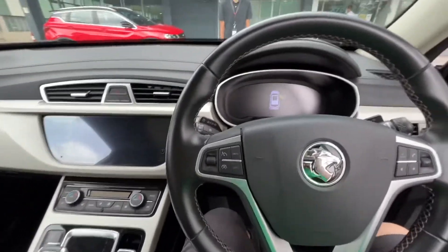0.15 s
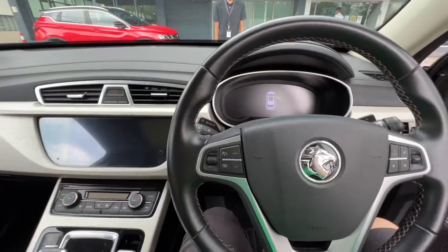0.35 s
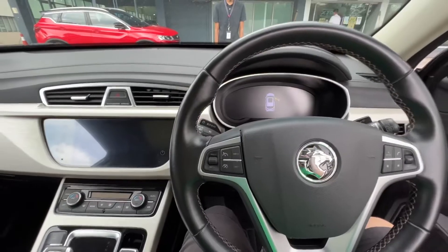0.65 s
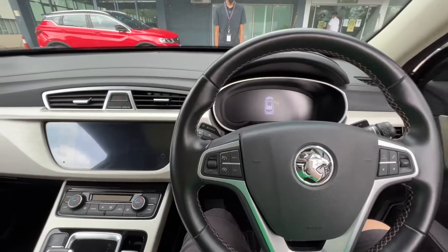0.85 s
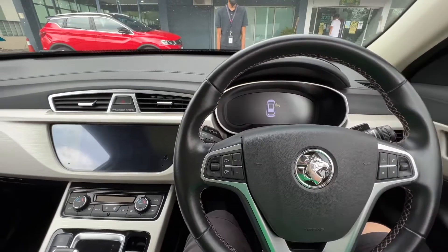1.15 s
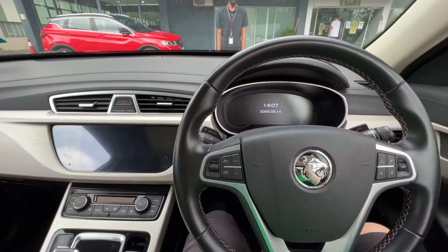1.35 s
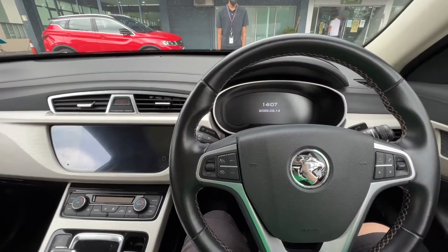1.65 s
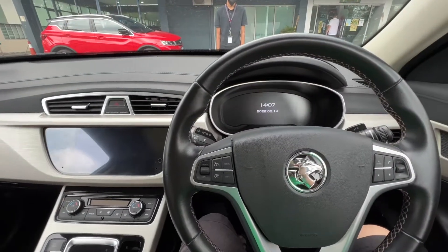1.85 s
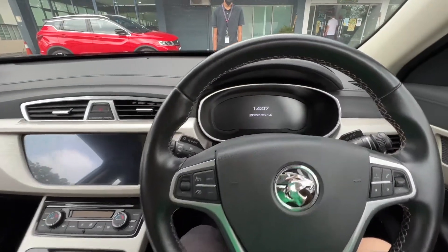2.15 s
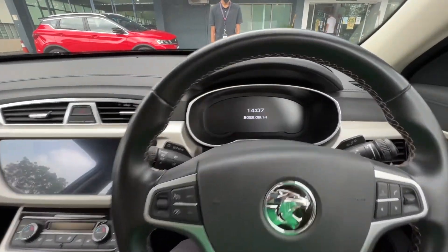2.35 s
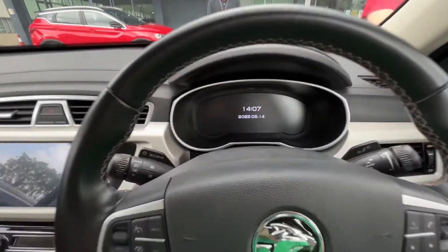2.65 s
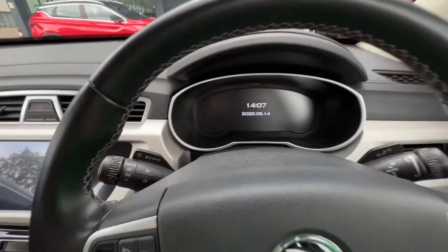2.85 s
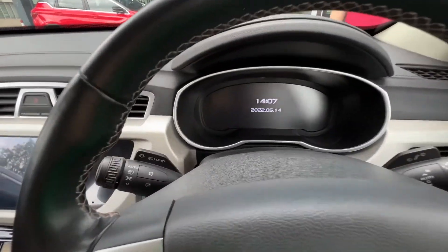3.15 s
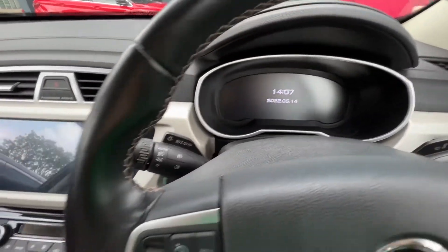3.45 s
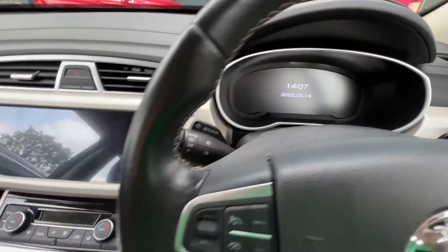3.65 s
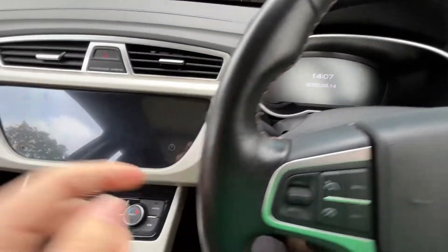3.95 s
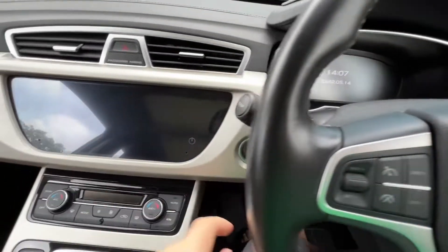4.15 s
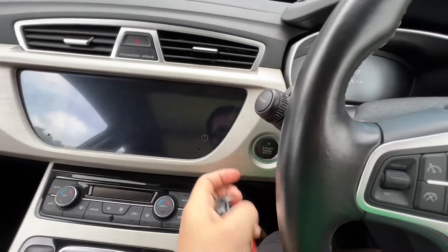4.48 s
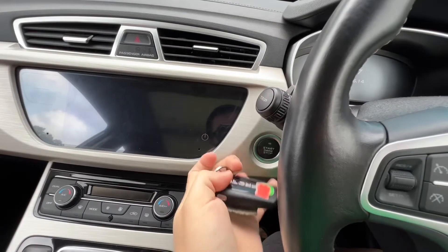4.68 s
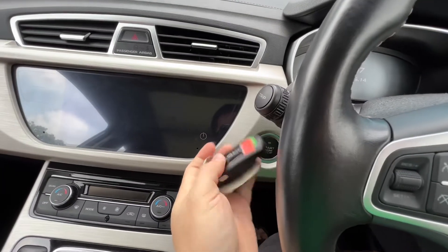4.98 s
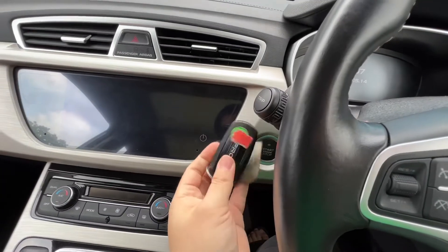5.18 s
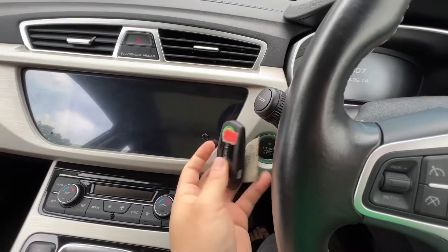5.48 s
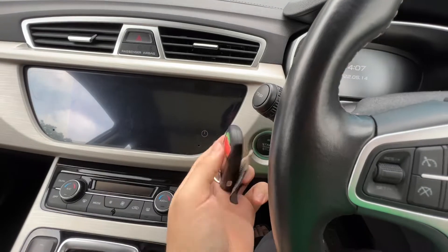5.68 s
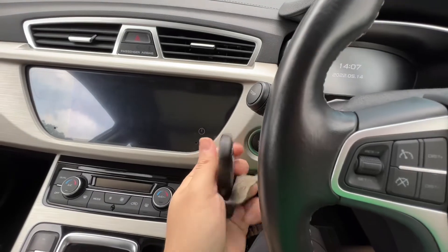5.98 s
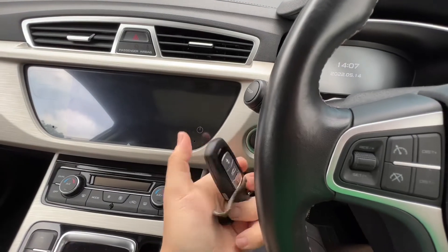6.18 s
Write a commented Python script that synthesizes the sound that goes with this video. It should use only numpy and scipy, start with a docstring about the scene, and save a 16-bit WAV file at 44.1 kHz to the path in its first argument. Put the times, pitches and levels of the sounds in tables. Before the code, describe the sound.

Faint street noise is cut off by a loud car door thud, leaving a quiet rumbling cabin with soft seat rustles, muffled knocks and small plastic clicks.

```python
"""Car door pulled shut

Inside a parked car, the driver's door is pulled shut: the latch strikes, the cabin air booms, the door
rattles on its rebound. The street hiss is shut out and a low rumble remains. Clothes slide on the seat,
a hand bumps the trim, and a plastic key fob is turned in the fingers. Knocks are shaped noise bursts and
ringing modes, the boom is a gliding tone, the rest is filtered noise and a chirp.
Levels in the tables are those before each layer's own trims and panning."""
import sys
import numpy as np
from scipy import signal
from scipy.io import wavfile

SR = 44100
rng = np.random.default_rng(int(sys.argv[2]) if len(sys.argv) > 2 else 0)


def generate_wav(signal):
    """Clip the signal to [-1, 1] and save it as 16-bit WAV at the path in sys.argv[1]."""
    frames = np.transpose(np.atleast_2d(signal))
    scaled = np.clip(frames, -1, 1) * 32767
    pcm = np.round(scaled).astype(np.int16)
    wavfile.write(sys.argv[1], SR, pcm)


N = 278712
TIME = np.arange(N) / SR   # seconds
EDGES = 20 * 2 ** (np.arange(30) / 3)   # limits of the third-octave bands, Hz
CENTRES = np.sqrt(EDGES[1:] * EDGES[:-1])   # Hz


def door():
    """The trim clatters, the shell rings, the latch clangs, the panel thuds and the sealed air booms."""
    clatter = door_clatter()
    shell = door_shell()
    steel = from_db(-1.0) * latch()
    panel = door_panel()
    return clatter + shell + steel + panel + boom(spread=0.25)


# Contacts of latch, striker, seal and rattling trim.
# Each row: start in seconds, clack in dB, knock in dB, treble slope in dB per octave.
DOOR_CONTACTS = [(1.132, -20, -19, -8), (1.14, -15.5, -20.5, -18), (1.147, -13.5, -11, -10.5),
                 (1.152, -22, -7.5, -3), (1.177, -28, -18, -3.5), (1.197, -20, -29.5, -8),
                 (1.222, -30.5, -22.5, -5), (1.241, -49.5, -36, 0.5), (1.267, -35, -26, -9.5),
                 (1.306, -30.5, -17, -16), (1.311, -35, -21.5, -5.5), (1.322, -36, -18, -14),
                 (1.331, -26.5, -27.5, -5.5), (1.347, -31, -23.5, -8.5), (1.355, -31.5, -32.5, -14),
                 (1.366, -31, -29, -19), (1.43, -34, -32.5, -13.5), (1.442, -41, -47, -10)]
# Colour of the clatter. Each row: frequency in Hz, level in dB per Hz.
CLATTER_COLOUR = [(88, -30), (150, 3), (230, -4.5), (360, -9), (500, -10.5), (800, -17.5), (1200, -16),
                  (1700, -17.5), (1950, -25), (2350, -26), (2900, -33.5), (3700, -35), (5000, -42.5),
                  (9270, -44.5), (11700, -50.5), (13900, -68.5), (15000, -64)]
# How long door and cabin ring. Each row: frequency in Hz, time to fall by 60 dB in seconds.
CLATTER_DECAY = [(200, 0.13), (600, 0.16), (1500, 0.16), (4000, 0.19), (12000, 0.15)]


def door_clatter():
    """Each contact is a noise burst: the clack and knock set its mids and lows, the slope its treble."""
    zones = [(700, 2500), (170, 700), (2500, 6000), (6000, 17000)]   # Hz: clack, knock, snap, tick
    snap_octaves, tick_octaves = 1.5, 3   # above the clack
    hits = [(s, clack, knock, clack + slope * snap_octaves, clack + slope * tick_octaves)
            for s, clack, knock, slope in DOOR_CONTACTS]
    clatter = contacts(hits, zones, trims_db=[-1.2, 0.94, -0.5, 0.92], colour=CLATTER_COLOUR,
                       t60=per_band(CLATTER_DECAY), rise_s=.0011, crack_s=0.003, tail_db=-8)
    clatter = reflections(clatter, wet_db=-21.5, longest_s=0.0056)
    # the body of the clatter comes from the door on the right, its treble off the windscreen
    body = signal.sosfilt(signal.butter(1, 800, fs=SR, output="sos"), clatter)
    treble = clatter - body
    return from_right(panned(body, left_db=-5.0) + panned(treble, left_db=3.5), lag_s=.0004)


# Steel of the latch striking home and chattering on the rebound.
# Each row: start in seconds, level in dB, frequency in Hz that the point of contact favours.
LATCH_STRIKES = [(1.1301, -18.5, 3500), (1.1307, -21.5, 2150), (1.1316, -19.5, 1430), (1.1375, -29.5, 3580),
                 (1.139, -22.5, 950), (1.145, -21.5, 1100), (1.15, -11.5, 1700), (1.1524, -16.5, 2520),
                 (1.198, -25, 2000), (1.313, -31, 1350), (1.331, -23, 2080), (1.333, -25.5, 1340),
                 (1.346, -23.5, 1410), (1.357, -35, 1250), (1.366, -35, 1900), (1.432, -37, 1350),
                 (1.447, -41, 1400)]
# Ringing tones of the latch. Each row: frequency in Hz, level in dB, time to fall by 60 dB in seconds.
LATCH_MODES = [(1015, -2, .04), (1240, 0, .05), (1400, -1, .035), (1490, -4, .03), (1630, -4, .022),
               (1735, -1, .028), (1970, -1, .03), (2150, -2, .028), (2440, -3, .03), (2600, -2, .025),
               (2900, -3, .02), (3440, 0, .028), (3760, 0, .028), (4650, -7, .018)]
# Each strike skips on: for at most how many seconds, how much weaker (dB), how far its pitch strays
CHATTER_S, CHATTER_DB, CHATTER_OCTAVES = .008, -13.5, 0.28


def latch():
    """Steel strikes steel and skips a few times; each touch rings the tones nearest its own pitch."""
    skips = []
    for s, level_db, hz in LATCH_STRIKES:
        for _ in range(3):
            later_s = s + CHATTER_S * rng.uniform(.1, 1)
            skips.append((later_s, level_db + CHATTER_DB, hz * 2 ** (CHATTER_OCTAVES * rng.standard_normal())))
    blows = LATCH_STRIKES + skips
    steel = np.array([struck(blows, LATCH_MODES, focus_db=24.5, scatter_db=2.0) for side in range(2)])
    steel = reflections(steel, wet_db=-15.5, longest_s=0.0053)
    return panned(from_right(steel, lag_s=.00015), left_db=3.0)


# Ringing tones of the door shell. Each row: frequency in Hz, level in dB, time to fall by 60 dB in seconds.
SHELL_MODES = [(284, -11, .11), (423, -17, .1), (528, -17, .13), (577, -17, .11), (704, -15, .17),
               (824, -17, .12), (935, -17, .14), (1020, -20, .14), (1174, -15, .12), (1256, -17, .13),
               (1400, -20, .09), (1455, -19, .09), (1571, -20, .09), (1725, -25, .09), (1960, -22, .1),
               (2426, -21, .09), (3446, -29, .1)]


def door_shell():
    """The contacts ring the shell, heard from the side: the two ports get it in opposite phase."""
    shell = np.array([sign * ring(DOOR_CONTACTS, SHELL_MODES, scatter_db=4.0, contact_hz=5000)
                      for sign in (1, -1)])
    shell[1] = np.roll(shell[1], int(.0003 * SR))   # one port hears it later
    return panned(from_db(-2.0) * shell, left_db=-3.0)


# The door's weight landing on the seal. Each row: start in seconds, level in dB.
DOOR_SHOVES = [(1.147, -18), (1.1565, -10), (1.191, -15), (1.218, -24), (1.27, -15), (1.311, -17.5),
               (1.326, -19.5), (1.357, -20)]
# Slow tones of the door panel. Each row: frequency in Hz, level in dB, time to fall by 60 dB in seconds.
PANEL_MODES = [(92.3, -1, 0.15), (111.4, -9.5, 0.45), (138.4, -9.5, 0.3), (154, -5, 0.12),
               (197.2, -13, 0.055), (254, -14, 0.045)]


def door_panel():
    """The weight of the door shoves the soft seal, so only low tones of the panel ring."""
    panel = ring(DOOR_SHOVES, PANEL_MODES, scatter_db=3.5, contact_hz=395)
    return from_db(-1) * from_right(panned(panel, left_db=-2.4), lag_s=0.0007)


# Cabin air pumped by the door as it swings in, lands and rocks on the seal.
# Each row: peak time in seconds, half length in seconds, pitch in Hz, peak level in dB.
AIR_PUMPS = [(1.126, 0.036, 51, -16.5), (1.178, 0.013, 65.5, -6), (1.253, .037, 49.6, -6.5),
             (1.346, 0.025, 60.8, -18.5), (1.466, 0.068, 47.5, -21.5)]
PRESSED_S = 1.171   # the door is deepest in its seal and the air most compressed


def boom(spread):
    """Trapped air swings with each push; standing waves put the sides slightly out of step (radians)."""
    pushes = np.array([from_db(level_db) * bell(s, half_s) for s, half_s, hz, level_db in AIR_PUMPS])
    level = pushes.sum(axis=0)
    pitch = np.array(AIR_PUMPS)[:, 2] @ pushes / level   # the strongest push decides most
    phase = 2 * np.pi * np.cumsum(pitch) / SR
    phase -= phase[int(PRESSED_S * SR)]
    return level * np.cos(phase + spread * drift(rate=12) * [[1], [-1]])


# Bumps of hand and knee on the seat and trim. Each row: start in seconds, knock in dB, floor pan in dB,
# treble slope in dB per octave, frequency in Hz that the spot favours.
BUMPS = [(3.323, -50.5, -48, -9.5, 731), (3.361, -49, -58.5, -19.5, 646), (3.387, -48.5, -41, -5.5, 780),
         (3.442, -53, -65, -25, 597), (3.497, -48.5, -49.5, -22.5, 770), (3.543, -49, -63.5, -17, 780),
         (3.573, -47, -64, -8, 560), (3.612, -49, -46, -6.5, 766), (3.651, -47, -47, -5, 775),
         (3.665, -32, -25, -10, 520), (3.741, -47.5, -45, -8, 500), (3.782, -43, -54, -17, 496),
         (3.831, -38.5, -43, -8, 570), (3.841, -40.5, -28.5, -13, 493), (3.926, -51, -49, -18, 450),
         (3.971, -43.5, -59, -9, 416), (4.02, -39.5, -43, -11, 520), (4.029, -41, -42, -11, 395),
         (4.08, -37.5, -33.5, -23, 543), (4.122, -40.5, -37, -10.5, 510), (4.154, -39.5, -36.5, -21, 480),
         (4.218, -48.5, -46, -18, 776), (4.233, -53, -39, -15, 400), (4.246, -52, -44, -2.5, 450),
         (4.27, -48.5, -44, -5.5, 400), (4.295, -38, -36.5, -9, 530), (4.348, -50, -50, -14, 500),
         (4.441, -44.5, -44, -9, 417), (4.631, -39.5, -41, -8, 457), (4.659, -46.5, -34, -5.5, 393),
         (4.862, -48, -67, -3, 1090)]
# Colour of the knocks. Each row: frequency in Hz, level in dB per Hz.
BUMP_COLOUR = [(53, -33), (90, 4), (125, -15.5), (286, -22.5), (463, -19), (630, -19), (735, -41),
               (926, -25), (1590, -31), (1780, -34), (9000, -61), (11700, -89), (19800, -120)]
# Short tones of the padded trim. Each row: frequency in Hz, level in dB, time to fall by 60 dB in seconds.
TRIM_MODES = [(329, 0, 0.13), (431, 0.5, 0.067), (482, 4, 0.044), (591, -1.5, 0.05), (779, -2, 0.037),
              (908, -9.5, 0.07), (1110, -2.5, 0.049), (1670, -12, .025)]
# Low tones of the floor pan. Each row: frequency in Hz, level in dB, time to fall by 60 dB in seconds.
FLOOR_MODES = [(123, 2, 0.14), (145.3, -26, 0.06)]
FLOOR_LAG_S = 0.0101   # the floor pan answers late
THUD_OVER_KNOCK_DB = -2   # the padding thuds with every knock


def bumps():
    """Dull, hollow knocks of hand and knee on padded trim, over the slips of the seat."""
    zones = [(250, 1000), (90, 250), (1000, 2500), (2500, 9000)]   # Hz: knock, thud, clack, snap
    clack_octaves, snap_octaves = 1.5, 2.5   # above the knock
    slips = seat_slips()
    blows = [(s, knock, slope, hz) for s, knock, floor, slope, hz in BUMPS] + slips
    hits = [(s, knock, knock + THUD_OVER_KNOCK_DB, knock + slope * clack_octaves, knock + slope * snap_octaves)
            for s, knock, slope, hz in blows]
    knocks = contacts(hits, zones, trims_db=[-1.5, 1.5, 1.5, 0.0], colour=BUMP_COLOUR,
                      t60=0.18, rise_s=0.0014, crack_s=0.0023, tail_db=-9)
    taps = [(s, knock, hz) for s, knock, slope, hz in blows]
    trim = np.array([struck(taps, TRIM_MODES, focus_db=21.5, scatter_db=3.5) for side in range(2)])
    floor_blows = [(s + FLOOR_LAG_S, floor) for s, knock, floor, slope, hz in BUMPS]
    thuds = ring(floor_blows, FLOOR_MODES, scatter_db=1.5, contact_hz=192.5)
    knocks = reflections(knocks, wet_db=-20.5, longest_s=0.004)
    return panned(knocks + from_db(-4.5) * trim + thuds, left_db=1.5)


def seat_slips():
    """The seat cover sticks and slips under the shifting weight: (s, dB, slope dB per octave, Hz)."""
    return [(s, -50.5 + 1.2 * rng.standard_normal(), -10.5, rng.uniform(430, 1200))
            for s in uneven_times(3.6, 4.7, count=16)]


# Small plastic clicks, nearly all from the key fob and its ring.
# Each row: start in seconds, snap peak in dB, brightness in dB.
KEY_CLICKS = [(0.867, -46, 5.5), (2.518, -66, 16), (4.367, -57, 0), (4.406, -41.5, 4), (4.431, -54, 7),
              (4.4802, -44.5, -3.5), (4.574, -46.5, 2), (4.9417, -55.5, 8), (4.9514, -50.5, -3.5),
              (4.9776, -38, 2), (5.0007, -38, -0.5), (5.05, -48.5, -7), (5.0605, -44, 5.5),
              (5.139, -47.5, 1.5), (5.1811, -56, 15.5), (5.4322, -46.5, 1), (5.577, -61, 4),
              (5.639, -65, -6), (5.704, -55, 8.5), (5.8215, -53.5, 3.5), (5.8616, -39.5, 5.5),
              (6.074, -61, 0), (6.0855, -52.5, 6), (6.111, -58, 0.5)]
# Colour of the clicks. Each row: frequency in Hz, level in dB per Hz.
KEY_COLOUR = [(470, -45), (800, -56), (1160, 4), (1630, -7.5), (1800, 1.5), (2190, -12), (2410, 2),
              (4620, -3), (5490, -5), (9070, -1), (10500, -5), (12300, -10), (15000, -49)]
# Ringing tones of the fob's plastic shell and metal ring.
# Each row: frequency in Hz, level in dB, time to fall by 60 dB in seconds.
KEY_MODES = [(2285, -5, 0.081), (2640, -11, 0.11), (3140, -7, 0.015), (4370, -6, 0.055), (4690, 7, 0.037),
             (5140, 2, 0.023), (6870, -2, 0.028), (8700, 2, 0.026), (11900, -15, 0.022)]
KEY_CLACK_DB, KEY_TICK_DB = -5.5, -18   # beside the snap; brightness trades clack for tick
KEY_PITCH_HZ, KEY_BRIGHT_DB_PER_OCTAVE = 4280, 23   # brighter clicks ring higher modes


def key_fob():
    """Small hard clicks that ring the fob, and rubs between them, close by and a little to the left."""
    zones = [(2500, 7000), (800, 2500), (7000, 17000)]   # Hz: snap, clack, tick
    # fainter ticks while the fob turns in the fingers
    turns = [(s, -63.5 + 1.46 * rng.standard_normal(), 0) for s in uneven_times(5.55, 6.15, count=5)]
    touches = KEY_CLICKS + turns
    hits = [(s, snap, snap + KEY_CLACK_DB - bright, snap + KEY_TICK_DB + bright) for s, snap, bright in touches]
    clicks = contacts(hits, zones, trims_db=[-9, -5.5, -1], colour=KEY_COLOUR,
                      t60=0.18, rise_s=.0001, crack_s=0.0022, tail_db=-7)
    taps = [(s, snap, KEY_PITCH_HZ * 2 ** (bright / KEY_BRIGHT_DB_PER_OCTAVE)) for s, snap, bright in touches]
    shell = np.array([struck(taps, KEY_MODES, focus_db=7.5, scatter_db=4.0) for side in range(2)])
    rubs = np.array([scuffs(width_share=0.29, grain_db=7.0) for side in range(2)])
    fob = reflections(clicks + from_db(-14.0) * shell + rubs, wet_db=-13.0, longest_s=0.0086)
    return panned(fob, left_db=3.5)


# Fingers and cloth scuffing over plastic. Each row: peak time in seconds, pitch in Hz, level in dB.
SCUFFS = [(0.25, 6950, -59.5), (3.39, 1780, -64.5), (3.66, 1250, -61), (3.832, 1450, -62),
          (4.395, 2820, -57), (4.415, 5400, -56), (4.957, 5100, -61), (5.055, 5160, -63.5),
          (5.646, 4530, -68), (5.758, 3200, -71.5), (5.951, 3050, -71), (6.091, 4580, -71.5)]
SCUFF_HALF_S, SCUFF_CATCHES_PER_S = 0.022, 770


def scuffs(width_share, grain_db):
    """Brief rubs: a run of tiny catches of uneven size in one broad resonance."""
    out = np.zeros(N)
    for s, hz, level_db in SCUFFS:
        caught = rng.random(N) < SCUFF_CATCHES_PER_S / SR
        sizes = from_db(grain_db * rng.standard_normal(N))
        catches = caught * sizes * rng.choice([-1, 1], N) + 1e-18
        peak = signal.iirpeak(hz, 1 / width_share, fs=SR)
        rub = signal.lfilter(*peak, signal.lfilter(*peak, catches))
        out += from_db(level_db) * bell(s, SCUFF_HALF_S) * rms_one(rub)
    return out


# Clothes sliding on the seat as the driver leans and reaches.
# Each row: start in seconds, length in seconds, hiss in dB, murmur in dB.
SLIDES = [(1.97, 0.61, -63, -48), (2.65, 0.65, -73, -49), (3.368, 0.49, -74, -47), (3.81, 0.5, -65, -45.5),
          (4.352, 0.3, -63.5, -46)]
# Colour of cloth sliding on the seat. Each row: frequency in Hz, level in dB per Hz.
CLOTH_COLOUR = [(240, -25), (400, -4), (600, -6.5), (800, -9), (1030, -5), (1400, -7), (1940, -10),
                (2700, -12.5), (4900, -18.5), (6200, -23), (8700, -21), (15000, -51)]
# Colour of the low murmur. Each row: frequency in Hz, level in dB per Hz.
MURMUR_COLOUR = [(12, -54), (20, -29.5), (37, -9), (59, 1), (70, -1), (85, -11), (100, -15), (120, -2),
                 (155, -20), (193, -11), (222, -22), (370, -21.5), (431, -28), (561, -36), (800, -45.5),
                 (1040, -63), (1760, -120)]
SLIDE_RISE_DB_PER_S, SLIDE_FALL_DB_PER_S, HISS_DB = 101, 46, -75   # the hiss level is between slides
CLOTH_PATCHY_DB, CLOTH_FOLDS_PER_S = 1.8, 16
# The air's lowest resonance and the murmur above it: levels in the shut cabin and with the door open
AIR_HZ, AIR_WIDTH_HZ = 52.8, 16
AIR_DB, AIR_OPEN_DB, AIR_FADE_DB_PER_S = -49, -40, 12
MURMUR_DB, MURMUR_OPEN_DB, SETTLE_DB_PER_S = -52.5, -41.5, 40.5
DOOR_SHUT_S = 1.47


def cabin(bands):
    """A low rumble around the air's lowest resonance; slides on the seat add cloth hiss and murmur."""
    slides = np.array([swell(s, length_s, SLIDE_RISE_DB_PER_S, SLIDE_FALL_DB_PER_S)
                       for s, length_s, hiss_db, murmur_db in SLIDES])
    slide_hiss, slide_murmur = (np.max(from_db(level_db)[:, None] * slides, axis=0)
                                for level_db in np.transpose(SLIDES)[2:])

    air_level = np.hypot(from_db(AIR_DB), from_db(AIR_OPEN_DB - AIR_FADE_DB_PER_S * TIME))
    air = air_level * narrow_noise(AIR_HZ, AIR_WIDTH_HZ)

    open_murmur = from_db(MURMUR_OPEN_DB) * swell(0, DOOR_SHUT_S, 0, SETTLE_DB_PER_S)
    murmur_level = np.hypot(from_db(MURMUR_DB), np.hypot(open_murmur, slide_murmur))
    murmur = murmur_level * np.tensordot(band_gains(MURMUR_COLOUR), bands, 1)[:, ::-1]   # the shared noise played backwards, so it differs from the street hiss

    # every band flickers by itself, then the whole cloth hiss wavers
    folds = sum(gain * from_db(CLOTH_PATCHY_DB * drift(rate=CLOTH_FOLDS_PER_S)) * band
                for gain, band in zip(band_gains(CLOTH_COLOUR), bands))
    waver = from_db(drift(rate=31) + drift(rate=3.9))
    cloth = reflections(np.hypot(from_db(HISS_DB), slide_hiss) * waver * folds, wet_db=-10.5, longest_s=0.013)
    return panned(air, left_db=2.5) + panned(murmur, left_db=0.1) + panned(cloth, left_db=2.5)


# Colour of the street hiss. Each row: frequency in Hz, level in dB per Hz.
STREET_COLOUR = [(41, -44.5), (70, -9.5), (128, 2), (161, -20.5), (201, 2), (246, -36), (345, -15),
                 (422, -20), (1330, -26.5), (1820, -34.5), (4170, -40.5), (4770, -42), (8950, -49.5),
                 (13700, -69.5), (15000, -72.5)]
# Steady fade of the street hiss, fastest at the top. Each row: frequency in Hz, loss in dB per second.
STREET_FADE = [(120, 7.5), (400, 10), (1500, 4), (4000, 6.5), (9000, 17.5)]
# Drone of traffic through the open door. Each row: frequency in Hz, width in Hz, level in dB.
DRONE = [(118.9, 2.1, -46), (294.4, 9.6, -56), (347.5, 6.9, -54)]
STREET_DB, SEALING_S = -38, 0.44   # hiss level at first, and the time that the gap takes to seal
DRONE_DB, DRONE_FADE_DB_PER_S = 2.5, 11   # raises, then fades, all drone tones


def street(bands):
    """Hiss, traffic drone and a chirp come in, ever duller as the door swings, until it seals."""
    hiss = sum(gain * from_db(STREET_DB - fade * TIME) * band
               for gain, fade, band in zip(band_gains(STREET_COLOUR), per_band(STREET_FADE), bands))
    tones = sum(from_db(tone_db) * narrow_noise(hz, width_hz) for hz, width_hz, tone_db in DRONE)
    drone = from_db(DRONE_DB - DRONE_FADE_DB_PER_S * TIME) * tones
    outside = reflections(hiss, wet_db=-13.0, longest_s=0.0068) + drone + chirp()
    door_open = np.clip((DOOR_SHUT_S - TIME) / SEALING_S, 0, 1)
    return door_open * panned(from_right(outside, lag_s=0.00045), left_db=1.2)


CHIRP_S, CHIRP_HZ, CHIRP_SAG_HZ_PER_S = .48, 4870, 900
CHIRP_DB, CHIRP_RISE_DB_PER_S, CHIRP_FALL_DB_PER_S = -57.5, 1200, 150


def chirp():
    """One thin note outside that flickers, and sags in pitch as it fades."""
    hz = CHIRP_HZ - CHIRP_SAG_HZ_PER_S * np.clip(TIME - CHIRP_S, 0, 1)
    phase = 2 * np.pi * np.cumsum(hz) / SR
    level = from_db(CHIRP_DB + 5.3 * drift(rate=90))
    return level * swell(CHIRP_S, 0, CHIRP_RISE_DB_PER_S, CHIRP_FALL_DB_PER_S) * np.sin(phase)


def contacts(hits, zones, trims_db, colour, t60, rise_s, crack_s, tail_db):
    """Each contact is a short crack and a dense tail of reflections; each level drives one zone (Hz)."""
    size = SR // 3
    t = np.arange(size) / SR
    noise = noise_bands(size=4 * size)
    out = np.zeros((2, N + size))
    hz = CENTRES[:, None]
    crack = np.exp(-t / (crack_s + 1 / hz))   # low bands need a cycle to start and to stop
    tail = from_db(tail_db) * np.exp(-np.log(1000) * t / np.reshape(t60, (-1, 1)))
    shape = (crack + tail) * (1 - np.exp(-t / (rise_s + .5 / hz)))
    shares = np.array([band_gains(colour) * ((CENTRES >= low) & (CENTRES < high)) for low, high in zones])
    shares /= np.linalg.norm(shares, axis=1, keepdims=True)
    for (s, *levels_db), start in zip(hits, rng.integers(0, 2 * size, len(hits))):
        burst = noise[:, :, start:start + size] * shape[:, None]
        # even out the chance loudness of this stretch of noise
        even = np.sqrt(2 * np.sum(shape ** 2, axis=1) / np.einsum("bcn,bcn->b", burst, burst))
        gains = from_db(np.add(levels_db, trims_db)) @ shares * even
        at = int(s * SR)
        out[:, at:at + size] += np.tensordot(gains, burst, 1)
    return out[:, :N]


def struck(blows, modes, focus_db, scatter_db):
    """Blows (s, dB, Hz) ring most the modes near their own pitch; the others lose focus_db per octave."""
    s, level_db, favoured_hz = np.transpose(blows)
    out = np.zeros(N)
    for k, mode in enumerate(modes):
        octaves_off = np.abs(np.log2(mode[0] / favoured_hz))
        hits = np.column_stack([s, level_db - focus_db * octaves_off])
        out += (-1) ** k * ring(hits, [mode], scatter_db, contact_hz=9000)
    return out


def ring(hits, modes, scatter_db, contact_hz):
    """Blows (s, dB) ring every mode, each with its own strength; a soft contact dulls the blow."""
    s, level_db = np.transpose(hits)[:2]
    out = np.zeros(N)
    for hz, mode_db, t60 in modes:
        clicks = np.full(N, 1e-18)
        clicks[(s * SR).astype(int)] = from_db(level_db + mode_db + scatter_db * rng.standard_normal(len(s)))
        r = from_db(-60 / (t60 * SR))   # what is left after each sample
        w = 2 * np.pi * hz / SR
        out += signal.lfilter([0, np.sin(w)], [1, -2 * r * np.cos(w), r * r], clicks)
    return signal.sosfilt(signal.butter(2, min(contact_hz, SR / 3), fs=SR, output="sos"), out)


def reflections(x, wet_db, longest_s):
    """Glass and dashboard return the mids and highs within milliseconds, differently to each side."""
    bright = signal.sosfilt(signal.butter(2, 600, "high", fs=SR, output="sos"), x)
    out = x.copy()
    for side in range(2):
        lags = (rng.uniform(.15, 1, 6) * longest_s * SR).astype(int) + 1
        for k, lag in enumerate(lags):
            out[side, lag:] += (-1) ** k * from_db(wet_db) * bright[side, :-lag]
    return out


# How alike left and right are. Each row: frequency in Hz, likeness from -1 (opposite) to 1 (same).
LIKENESS = [(30, 0.32), (60, 0.27), (130, 0.98), (290, 0.36), (640, 0.28), (1410, 0.18), (3100, -0.31),
            (7000, -0.0092), (15000, 0.56)]


def noise_bands(size):
    """Third-octave stereo noises of rms 1, each as alike on both sides as the table says."""
    run_in = SR // 4
    white = rng.standard_normal((2, 2, size + run_in))
    bands = []
    for k, alike in enumerate(np.clip(per_band(LIKENESS), -.99, .99)):
        sos = signal.butter(2, EDGES[k:k + 2], "band", fs=SR, output="sos")
        mid, side = signal.sosfilt(sos, white[k % 2])[:, run_in:]
        bands.append(rms_one(np.sqrt(1 + alike) * mid + np.sqrt(1 - alike) * side * [[1], [-1]]))
    return np.array(bands)


def narrow_noise(hz, width_hz):
    """Noise twice through one resonance; rms 1."""
    peak = signal.iirpeak(hz, hz / width_hz, fs=SR)
    noise = rng.standard_normal(N + SR)
    return rms_one(signal.lfilter(*peak, signal.lfilter(*peak, noise))[SR:])


def per_band(points):
    """Read a table over frequency at the band centres."""
    hz, value = np.transpose(points)
    return np.interp(np.log(CENTRES), np.log(hz), value)


def band_gains(colour):
    """Amplitude of each band for a spectrum given per Hz; total power 1."""
    gains = from_db(per_band(colour)) * np.sqrt(np.diff(EDGES))
    return gains / np.linalg.norm(gains)


def drift(rate):
    """Random wander: straight lines between random points, so many per second."""
    knots = rng.standard_normal(2000)
    return np.interp(TIME * rate, np.arange(len(knots)), knots)


def swell(start_s, hold_s, rise_db_per_s, fall_db_per_s):
    """Gain that rises to 1, holds and dies away."""
    before = np.maximum(start_s - TIME, 0)
    after = np.maximum(TIME - start_s - hold_s, 0)
    return from_db(-rise_db_per_s * before - fall_db_per_s * after)


def bell(s, half_s):
    """Smooth gain that peaks at one moment."""
    return np.exp(-np.minimum(((TIME - s) / half_s) ** 2, 60))


def uneven_times(from_s, to_s, count):
    """Moments that follow each other at uneven gaps."""
    return from_s + (to_s - from_s) * (np.arange(count) + rng.random(count)) / count


def from_right(x, lag_s):
    """Sound from the door's side reaches the left port late."""
    return np.array([np.interp(TIME - lag_s, TIME, x[0]), x[1]])


def panned(x, left_db):
    """Make the left side louder than the right, or softer if negative."""
    return x * from_db([[left_db / 2], [-left_db / 2]])


def from_db(db):
    """Decibels to gain."""
    return 10 ** (np.asarray(db) / 20)


def rms_one(x):
    """Scale to unit rms."""
    return x / np.sqrt(np.mean(x ** 2) + 1e-20)


def scene():
    """Everything heard from the driver's seat."""
    bands = noise_bands(size=N)
    return door() + bumps() + key_fob() + street(bands) + cabin(bands)


# Dips in the microphone's treble. Each row: frequency in Hz, width in Hz.
PORT_DIPS = [(10300, 760), (13700, 590)]


def record(dry):
    """The microphone ports notch the treble, peaks are rounded, the top is cut."""
    for hz, width_hz in PORT_DIPS:
        dry = signal.lfilter(*signal.iirnotch(hz, hz / width_hz, fs=SR), dry)
    rounded = dry / (1 + (dry / .95) ** 6) ** (1 / 6)
    return signal.sosfilt(signal.ellip(10, .1, 80, 15900, fs=SR, output="sos"), rounded)


dry = scene()
out = record(dry)
generate_wav(out)
```